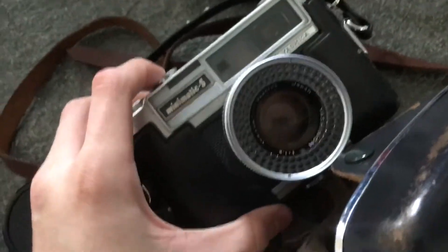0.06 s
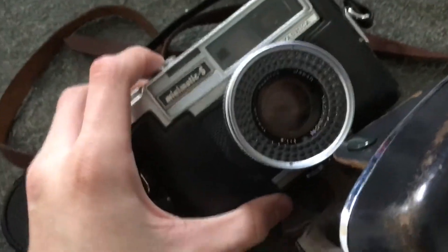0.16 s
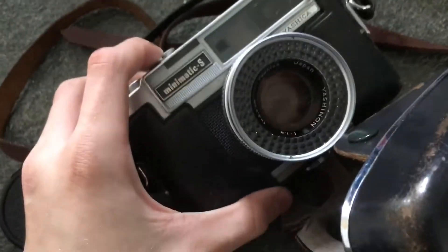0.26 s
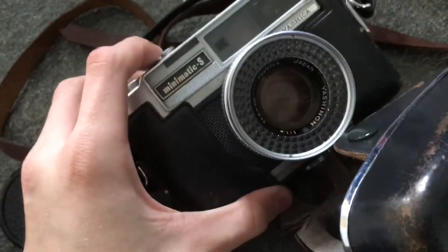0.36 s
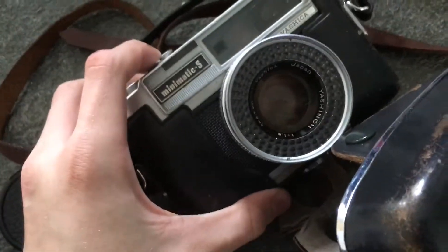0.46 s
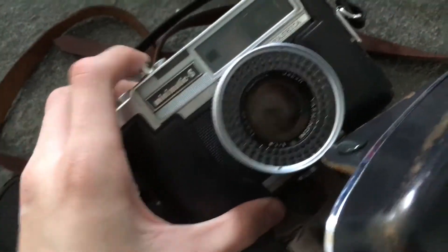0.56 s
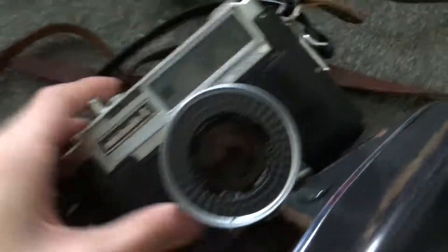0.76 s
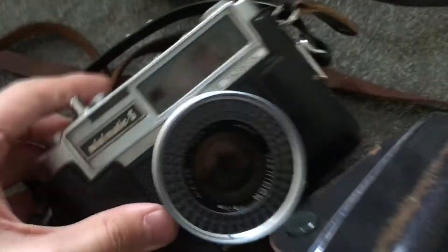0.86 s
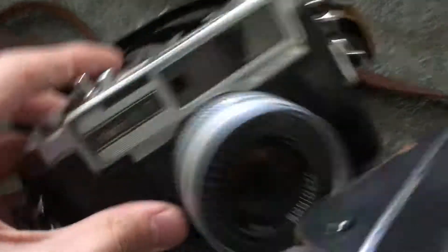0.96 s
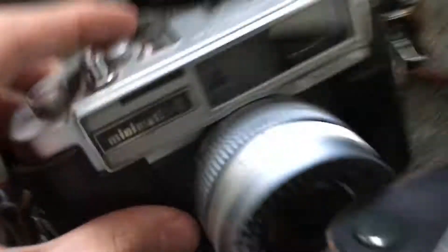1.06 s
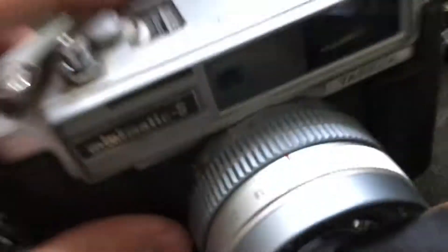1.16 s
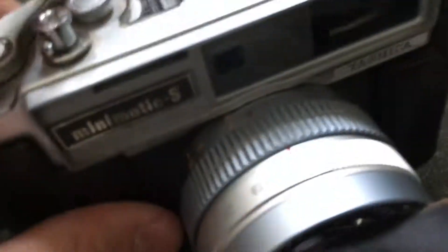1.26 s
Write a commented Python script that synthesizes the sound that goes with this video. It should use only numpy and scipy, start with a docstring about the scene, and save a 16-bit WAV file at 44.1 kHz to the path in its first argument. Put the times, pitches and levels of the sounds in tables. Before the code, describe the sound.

One loud metallic shutter click, followed by faint clicks and rustling of an old camera being turned

```python
"""A few small ticks, then a shutter snaps and settles, then more ticks and scrapes over a rustle, hum and hiss.
An old film camera's release is pressed and its leaf shutter fires: noise cracks ring decaying housing modes.
The camera is lifted and turned: lever, strap lugs and cap tick (noise crack plus rough ring) and scrape
(resonant noise); leather and skin rustle (dense random grains). A small room adds noise tails.
Hum is a drifting tone in low noise; rumble and hiss are filtered noise."""
import sys
import numpy as np
from scipy import signal
from scipy.fft import rfft, irfft
from scipy.io import wavfile

SR = 44100
rng = np.random.default_rng(int(sys.argv[2]) if len(sys.argv) > 2 else 0)


def generate_wav(sig):
    """Save sig (samples, or channels by samples) to the path in sys.argv[1] as 16-bit PCM at SR."""
    pcm = np.round(np.clip(np.atleast_2d(sig).T, -1, 1) * 32767).astype(np.int16)
    wavfile.write(sys.argv[1], SR, pcm)


def field_ratio(decibels):
    """Amplitude ratio for a level in dB (20 dB per decade); scalars and array-likes work."""
    return 10 ** (np.asarray(decibels, dtype=float) / 20)


N = 57330  # samples, 1.3 s

# blows of the shutter's metal parts: (time [s], level [dB], low modes relative to bright ones [dB])
BLOWS = [(0.2154, -45.5, -25), (0.2312, -30, -5.5), (0.2329, -6, 3), (0.2343, -28, -1.5), (.2352, -19, 10),
         (0.2385, -2, -10), (0.2412, -7.5, 0.5), (0.2424, -10, 8), (0.2454, -19, -16), (.247, -30.5, 5),
         (0.256, -34, 10), (0.2881, -27, 8.5), (.2902, -29, -8.5), (0.3095, -31.5, -7)]
# spectrum of the bright cracks: (frequency [Hz], level [dB])
CRACK_COLOUR = [(300, -41.5), (1000, -12), (2000, -0.5), (3500, -2.5), (6000, 2), (9000, -0.5),
                (12500, -8.5), (16000, -9)]


def evened(x):
    """Scale to rms 1."""
    return x / np.sqrt(np.mean(x ** 2) + 1e-20)


def read(points, hz):
    """Interpolate a table on a log-frequency axis."""
    table_hz, value = np.transpose(points)
    return np.interp(np.log(hz + 1), np.log(table_hz + 1), value, left=value[0])


def add(mix, start_s, sound):
    """Lay a sound into the mix in place, cut at the end."""
    part = mix[round(start_s * SR):][:len(sound)]
    part += sound[:len(part)]


def coloured(x, points):
    """Filter by a spectrum in dB."""
    hz = np.fft.rfftfreq(len(x), 1 / SR)
    return irfft(rfft(x) * field_ratio(read(points, hz)), len(x))


def background():
    """A wavering hum in lumpy low noise, a steady rumble and a faint hiss."""
    # waver of the hum: (time [s], level [dB])
    hum_level = [(0, -54.5), (.144, -45.5), (.228, -57), (.278, -45.5), (.328, -65.5), (0.354, -42.5),
                 (.47, -52), (0.555, -40.5), (0.584, -68), (.662, -44.5), (.70, -57), (.814, -45.5),
                 (0.913, -60.5), (.944, -44.5), (1.056, -46), (1.07, -53), (1.162, -41.5), (1.224, -50.5),
                 (1.3, -38.5)]
    # spectrum of the low noise: (frequency [Hz], level [dB])
    rumble_colour = [(15, -60.5), (25, -23.5), (38, -16), (59, -2.5), (114, -3), (133, -8), (162, -17),
                     (262, -23.5), (300, -16), (390, -36.5), (660, -120)]
    # spectrum of the hiss: (frequency [Hz], level [dB])
    air_colour = [(88, -31), (150, -2), (299, -31), (618, -24), (881, -31.5), (1330, -28.5), (9150, -41.5),
                  (16500, -45)]
    hum_hz, drift_rad_per_sample, tone_share = 118, 0.026, 0.85
    rumble_db, air_db = -57, -63.5

    t = np.arange(N) / SR
    time_s, hum_db = np.transpose(hum_level)
    drift = np.cumsum(rng.standard_normal(N)) * drift_rad_per_sample
    tone = np.sin(2 * np.pi * hum_hz * t + drift)
    tone = coloured(tone, [(60, -38.0), (90, -1.5), (140, 2), (180, -37.0)])  # Hz, dB
    lumps = evened(coloured(rng.standard_normal(N), rumble_colour))
    rumble = evened(coloured(rng.standard_normal(N), rumble_colour))
    air = evened(coloured(rng.standard_normal(N), air_colour))
    hum = tone_share * evened(tone) + (1 - tone_share) * lumps
    hum = field_ratio(np.interp(t, time_s, hum_db)) * evened(hum)
    return hum + field_ratio(rumble_db) * rumble + field_ratio(air_db) * air


def room(x):
    """Diffuse noise tail of unit energy, each band dying at its own speed."""
    # reverberation of the room: (frequency [Hz], t60 [s])
    room_t60 = [(300, 0.22), (700, .38), (1800, 0.62), (4500, 0.54), (9000, 0.24), (14000, 0.25)]
    gap_s = 0.0044  # silent up to here, full at twice this
    hz, t, z = signal.stft(rng.standard_normal(SR // 2), SR, nperseg=256)
    decay = field_ratio(-60 * t / read(room_t60, hz)[:, None])
    tail = signal.istft(z * decay, SR, nperseg=256)[1]
    tail *= np.clip(np.arange(len(tail)) / SR / gap_s - 1, 0, 1)
    return signal.fftconvolve(x, tail / np.linalg.norm(tail))[:N]


def echo():
    """The walls return each shutter blow, an impulse here, as a smooth wide wash."""
    # shutter colour as the walls return it, averaged over directions: (frequency [Hz], level [dB])
    wall_colour = [(350, -22.5), (700, 2.5), (1000, -6.5), (1500, -1.5), (3000, -4.5), (8000, -4.5),
                   (12000, -2), (16000, -15)]
    wall_db = -2.5
    knocks = np.zeros(N)
    for start_s, level_db, _ in BLOWS:
        knocks[round(start_s * SR)] = field_ratio(level_db + wall_db)
    return coloured(room(knocks), wall_colour)


def rustle():
    """Dense tiny slips: a duller layer from leather and a brighter hiss from skin and strap."""
    # rustle while the camera moves: (time [s], leather level [dB], skin level [dB])
    rustle_level = [(0.298, -62, -53.5), (.45, -64, -63), (.58, -65, -62.5), (.63, -55.5, -56.5),
                    (.69, -57.5, -61), (.73, -64, -89), (.79, -61, -71), (0.831, -59, -62.5),
                    (0.871, -60.5, -71), (.93, -55.5, -57.5), (.98, -55.5, -63.5), (1.02, -54.5, -75),
                    (1.045, -53.5, -86), (1.07, -57.5, -54.5), (1.13, -58, -61.5), (1.198, -63.5, -57),
                    (1.3, -97, -63.5)]
    # spectrum of the leather: (frequency [Hz], level [dB])
    leather_colour = [(110, -50), (180, -2), (505, -9.5), (705, -6.5), (3190, -17.5), (4970, -34),
                      (8000, -29.5), (10400, -28.5)]
    # spectrum of the skin hiss: (frequency [Hz], level [dB])
    skin_colour = [(1500, -4.5), (3300, -6), (5900, -7), (9200, -3), (10300, -21), (12000, -9.5),
                   (13600, -20.5), (15000, -10)]
    grains_per_s, grain_spread_db = 4500, 4.5

    time_s, leather_db, skin_db = np.transpose(rustle_level)
    t, out = np.arange(N) / SR, np.zeros(N)
    # last entry: smooth noise added to the grains
    for level_db, colour, smooth in ((leather_db, leather_colour, 0.5), (skin_db, skin_colour, 1.5)):
        size = field_ratio(grain_spread_db * np.minimum(rng.exponential(1, N), 5))
        size *= rng.random(N) < grains_per_s / SR
        grains = size * rng.choice([-1., 1.], N) + smooth * rng.standard_normal(N)
        level = field_ratio(np.interp(t, time_s, level_db, left=-120))
        out += level * evened(coloured(grains, colour))
    return out


def scrapes():
    """Gritty noise through one resonance, under a smooth swell."""
    # scrapes: (start [s], length [s], frequency [Hz], bandwidth [Hz], level [dB])
    scrape_list = [(0.612, 0.028, 4220, 672, -49.5), (0.613, 0.017, 1886, 900, -49),
                   (0.803, 0.059, 11500, 4000, -62), (.965, 0.023, 2980, 606, -49.5),
                   (.975, 0.037, 5560, 820, -57), (1.055, .095, 5450, 493, -64),
                   (1.056, 0.017, 3296, 2500, -47.5), (1.11, 0.019, 1372, 1480, -52)]
    out = np.zeros(N)
    for start_s, length_s, hz, width_hz, db in scrape_list:
        t = np.arange(0, length_s, 1 / SR)
        pole = np.exp(-np.pi * width_hz / SR)
        grit = rng.standard_normal((3, 4410))[:, :len(t)]
        rough = (grit[0] + 1j * grit[1]) * np.exp(grit[2])
        # low-pass at baseband, then shift up to hz
        slow = signal.lfilter([1], [1, -2 * pole, pole * pole], rough)
        tone = (slow * np.exp(2j * np.pi * hz * t)).real
        add(out, start_s, field_ratio(db) * np.sin(np.pi * t / length_s) * evened(tone))
    return out


def ticks():
    """Each tick is a bright noise crack and a short rough ring of the part it strikes."""
    # ticks of release, lever, lugs and cap: (time [s], crack level [dB], ring [Hz], ring level [dB], ring t60
    # [s])
    tick_list = [(0.1371, -42.5, 7600, -40, 0.0098), (0.143, -35, 11500, -33, 0.013),
                 (0.1438, -47, 1754, -41.5, 0.026), (0.1443, -56, 5670, -39, 0.012),
                 (0.6034, -33.5, 13700, -37.5, 0.017), (0.629, -35, 4240, -31.5, 0.019),
                 (0.6273, -63, 6400, -34.5, 0.013), (0.6316, -33.5, 1944, -30, 0.012),
                 (0.655, -46, 2830, -40, 0.036), (0.671, -35.5, 6900, -54, 0.027),
                 (.683, -67, 2910, -44, 0.03), (0.7022, -40.5, 974, -42, 0.032),
                 (0.7052, -43.5, 1530, -44.5, 0.028), (.709, -67, 622, -48, 0.061),
                 (0.756, -78, 2036, -42.5, 0.023), (.794, -49, 2540, -62, 0.019),
                 (0.874, -37, 1400, -30, 0.013), (.8745, -53.5, 720, -38.5, .02),
                 (0.8746, -57, 6480, -42, 0.011), (0.8731, -60, 3740, -43.5, 0.011),
                 (.899, -58, 2980, -71, 0.0078), (.918, -32, 3410, -31, 0.016),
                 (0.9187, -67, 2120, -23.5, 0.006), (.9205, -50, 1410, -39, 0.028),
                 (0.9218, -66, 905, -40, 0.048), (.9485, -39, 5400, -40, 0.0082),
                 (.957, -34, 1650, -37.5, 0.011), (0.98, -47, 2926, -39, 0.037),
                 (.994, -56, 8250, -45, 0.0085), (1.002, -45, 3340, -26, 0.0092),
                 (1.0032, -66, 5700, -41.5, 0.016), (1.005, -73, 554, -40.5, 0.035),
                 (1.0055, -53, 837, -35.5, 0.021), (1.005, -47, 1983, -34.5, 0.036),
                 (1.008, -36, 1116, -32.5, 0.023), (1.0104, -48, 2210, -38.5, 0.025),
                 (1.0103, -60, 1325, -36, 0.03), (1.032, -29.5, 6670, -39, 0.0022),
                 (1.054, -41, 4670, -57, 0.012), (1.059, -65, 2475, -38, 0.026),
                 (1.0885, -40.5, 4100, -42, 0.0066)]
    rise_s, longest_crack_t60_s = 0.00055, 0.0067
    width_share = 0.045  # ring bandwidth / pitch, from a random-walk phase
    out, t = np.zeros(N), np.arange(3000) / SR
    for start_s, crack_db, hz, ring_db, t60_s in tick_list:
        noise, jitter = rng.standard_normal((2, len(t)))
        wander = np.cumsum(jitter) * np.sqrt(2 * np.pi * width_share * hz / SR)
        ring = field_ratio(ring_db - 60 * t / t60_s) * np.sin(2 * np.pi * hz * t + wander)
        crack = evened(coloured(noise, CRACK_COLOUR))
        crack *= field_ratio(crack_db - 60 * t / min(t60_s, longest_crack_t60_s))
        add(out, start_s, np.minimum(t / rise_s, 1) * (crack + ring))
    return out


def shutter():
    """Every blow cracks and rings the decaying housing modes with its own chance weights."""
    # modes of the shutter housing: (frequency [Hz], level [dB], t60 [s])
    housing = [(200, -19.5, 0.022), (716, -15.5, 0.022), (866, -12, 0.016), (1047, -16.5, 0.028),
               (1402, -6.5, 0.028), (2090, -11.5, .012), (3060, -17.5, 0.013), (3920, -4.5, .012),
               (4050, -2, .01), (4303, -3.5, 0.012), (5370, -9, .006), (6920, -8.5, .01),
               (8340, 12, 0.0032), (9140, -1, .008), (11300, 0, 0.00299), (12210, 3, 0.009),
               (13900, -8, .005)]
    low_modes_hz, spread_db, detune_share = 2500, 3.0, 0.015
    crack_db, crack_t60_s, rise_s = 6.5, 0.007, 0.00015  # crack_db: before the common / 4

    out, t = np.zeros(N), np.arange(3000) / SR
    hz, mode_db, t60_s = np.transpose(housing)[:, :, None]
    for start_s, level_db, low_db in BLOWS:
        vary, tune = rng.standard_normal((2, *hz.shape))
        noise = rng.standard_normal(len(t))
        weight = field_ratio(mode_db + spread_db * vary + low_db * (hz < low_modes_hz))
        weight *= np.sign(vary * tune)  # random polarity
        tones = np.sin(2 * np.pi * hz * (1 + detune_share * tune) * t)
        rings = weight * field_ratio(-60 * t / t60_s) * tones
        crack = field_ratio(crack_db - 60 * t / crack_t60_s) * evened(coloured(noise, CRACK_COLOUR))
        blow = (rings.sum(0) + crack) / 4
        add(out, start_s, field_ratio(level_db) * blow * np.minimum(t / rise_s, 1))
    return out


def scene():
    """Camera near the microphone, its room tail and the background."""
    handling_tail_db = -17
    handling = ticks() + scrapes() + rustle()
    camera = shutter() + echo() + handling + field_ratio(handling_tail_db) * room(handling)
    return (camera + background())[None]


def band_limit(x):
    """A steep low-pass at the top of the band."""
    return signal.sosfilt(signal.butter(12, 17040, fs=SR, output="sos"), x)


def record(dry):
    """Steep low-pass: the extreme treble is cut off near 16 to 17 kHz."""
    # treble cut-off: (frequency [Hz], level [dB])
    treble_cutoff = [(13500, -1), (15800, -8.5), (16300, -24.5), (17000, -53.5)]
    mix = coloured(dry[0], treble_cutoff)[None]
    return band_limit(mix)


dry = scene()
out = record(dry)
generate_wav(out)
```